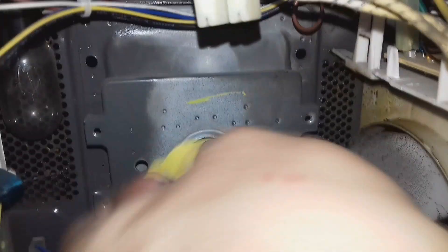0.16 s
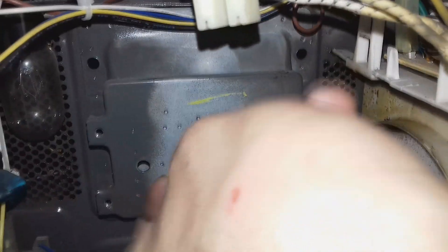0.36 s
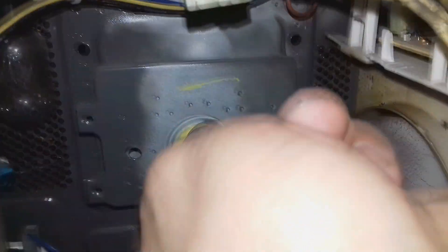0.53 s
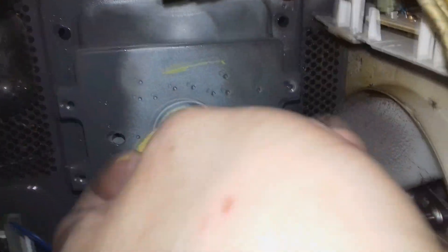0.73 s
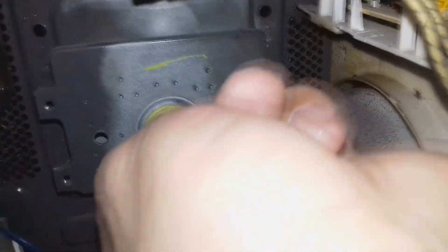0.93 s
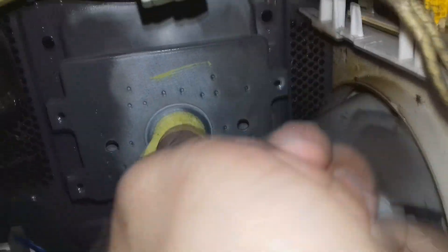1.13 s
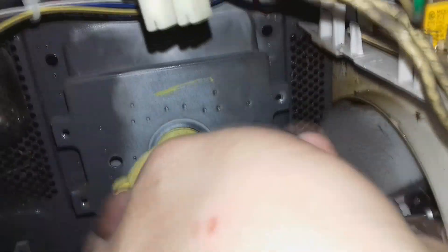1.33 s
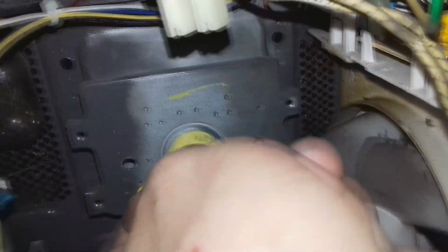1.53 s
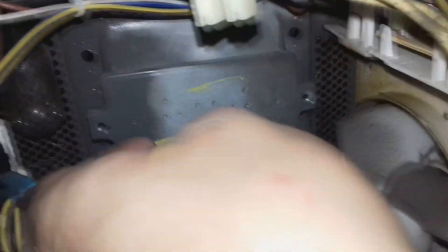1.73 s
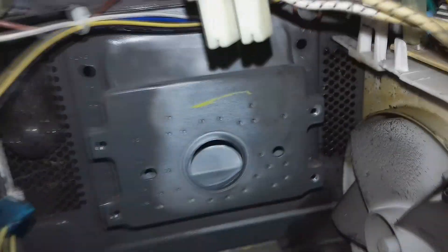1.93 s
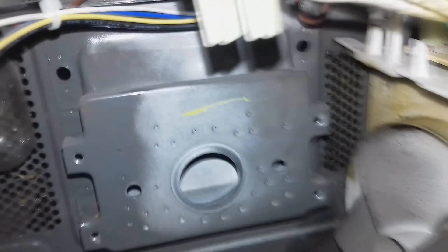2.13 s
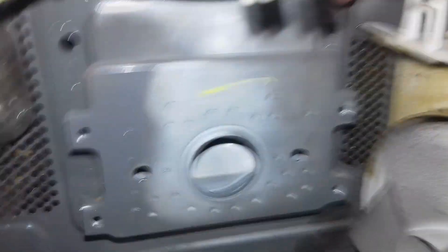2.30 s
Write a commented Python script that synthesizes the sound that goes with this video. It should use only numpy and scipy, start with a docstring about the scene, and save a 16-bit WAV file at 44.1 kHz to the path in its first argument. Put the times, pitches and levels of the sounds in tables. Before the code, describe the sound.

Close up in a quiet room, a hand twists sandpaper against sheet steel, making uneven, gritty scrapes with a thin metallic ring. The final stroke is the loudest and rings out briefly, followed by a faint brush and a small click.

```python
"""In a quiet room, close up, a hand twists sandpaper to and fro in the round port of a steel housing.
Grit catches and slips, ringing the sheet steel and its cabinet; the paper hisses, the wad drags
dully, and the hand rumbles and bumps. After a last hard stroke the hand lifts with a faint brush,
the steel rings out, and something small clicks."""
import sys
import numpy as np
from scipy import signal
from scipy.fft import rfft, irfft
from scipy.io import wavfile

SR = 44100
rng = np.random.default_rng(int(sys.argv[2]) if len(sys.argv) > 2 else 0)


def to_wav(sig):
    """Store sig (one row per channel, or 1-D mono) as 16-bit WAV at the path in sys.argv[1].

    Samples outside -1..1 are clipped; the rate is SR.
    """
    pcm = np.clip(np.atleast_2d(sig), -1, 1) * 32767
    pcm = np.round(pcm).astype(np.int16)
    wavfile.write(sys.argv[1], SR, pcm.T)  # frames by channels


N = 108486
TIME = np.arange(N) / SR


def amp(db):
    """Decibels to gain."""
    return 10 ** (np.asarray(db) / 20)


def unit(x):
    """Scales to rms 1."""
    return x / np.sqrt(np.mean(x ** 2) + 1e-20)


def at_hz(points, hz):
    """Reads a table on a log-frequency axis."""
    f, value = np.transpose(points)
    return np.interp(np.log(hz + 1), np.log(f + 1), value)


def curve(points):
    """Draws an envelope through (time, value) breakpoints."""
    s, value = np.transpose(points)
    return np.interp(TIME, np.maximum.accumulate(s), value)


def through(x, response):
    """Convolves with a response scaled to energy 1."""
    return signal.fftconvolve(x, response / np.linalg.norm(response))[:N]


def colour(x, eq, size=4096):
    """Minimum-phase EQ; the table sets only the shape, not the overall gain."""
    log_gain = np.log(amp(at_hz(eq, abs(np.fft.fftfreq(size, 1 / SR)))))
    spectrum = np.exp(np.conj(signal.hilbert(log_gain)))
    return through(x, np.fft.ifft(spectrum).real[:size // 2])


def ring(modes, start=0):
    """Dying modes struck at the start time."""
    t = TIME - start
    return (t >= 0) * sum(amp(db - 60 * abs(t) / t60) * np.sin(2 * np.pi * hz * t)
                          for hz, db, t60 in modes)


def grit(grains_per_s=5500, spread_db=4):
    """Tiny slips of many grains, a few of them large: the raw texture of all the rubbing."""
    size = amp(spread_db * np.minimum(rng.exponential(1, N), 4))
    return unit(size * rng.choice([-1., 1.], N) * (rng.random(N) < grains_per_s / SR))


def room_tone(level_db=-53.5):
    """A steady bed of quiet room noise."""
    # colour of the room: f/Hz, level/dB
    room_eq = [(25, -18), (52, -22), (90, -13), (243, -15.5), (500, -12.5), (900, -11.5), (1400, -7.5),
               (1750, -6), (2300, -1), (3380, -7), (4500, -18.5), (12000, -31)]
    return amp(level_db) * colour(rng.standard_normal(N), room_eq)


def hand_brush(peak_s=2.247, half_width_s=0.16, level_db=-49.5):
    """One soft swell of brushing as the hand withdraws."""
    # colour of the brushing: f/Hz, level/dB
    brush_eq = [(500, -16), (1600, 2.5), (2200, 6.5), (3300, 1), (4300, -27), (9000, -25)]
    swell = np.exp(-((TIME - peak_s) / half_width_s) ** 2)
    return amp(level_db) * colour(grit() * swell, brush_eq)


def small_click(trim_db=-8.5):
    """One hard tap rings something small."""
    # cue for the click: t/s, level/dB before the trim
    cues = [(2.4024, -23.5)]
    # modes of the small object: f/Hz, level/dB, t60/s
    modes = [(1784, -8, 0.041), (1620, -20.5, 0.29), (2330, -2.5, 0.0038), (2800, -3, 0.0064),
             (3350, -9, 0.019)]
    # colour of the tap: f/Hz, level/dB
    tap_eq = [(500, -26), (1300, -17), (1700, 1), (3600, 4.5), (4600, -9), (7000, -20), (12000, -27)]
    return colour(sum(amp(db + trim_db) * ring(modes, s) for s, db in cues), tap_eq)


def hand_bumps(attack_s=0.0042):
    """The soft hand bumps the housing and rings its low modes."""
    # cues for the bumps: t/s, level/dB
    cues = [(0.731, -43), (1.182, -39.5), (1.641, -46)]
    # modes that a bump rings: f/Hz, level/dB, t60/s
    modes = [(205, -2, 0.18), (244.3, 5, 0.21), (312, -3, 0.16), (434, -2, 0.095)]
    return sum(amp(db) * np.clip((TIME - s) / attack_s, 0, 1) * ring(modes, s) for s, db in cues)


def hand_rumble(grip):
    """Low drag of the hand on the panel."""
    # envelope of the rumble: t/s, level/dB
    envelope = [(0, -52), (.07, -61), (.12, -48.5), (.22, -53), (.3, -55.5), (.42, -64), (.54, -63),
                (.63, -52.5), (.74, -50), (.82, -59), (.88, -51), (.98, -71), (1.06, -50.5), (1.14, -66),
                (1.2, -48), (1.3, -49), (1.37, -76), (1.53, -58), (1.66, -53.5), (1.78, -58), (1.89, -76),
                (1.96, -51), (2.15, -71)]
    # colour of the rumble: f/Hz, level/dB
    rumble_eq = [(25, -32), (52, -43), (78, 2), (110, 4), (170, 4), (240, -2.5), (400, 2.5), (900, -8),
                 (4000, -64)]
    return colour(grit() * grip * amp(curve(envelope)), rumble_eq)


def judder(centre_hz=90, depth_db=0.5):
    """The wad grips and slides unevenly, putting a slight random flutter on the level."""
    hz = np.fft.rfftfreq(N, 1 / SR)
    flutter = irfft(rfft(rng.standard_normal(N)) * hz * np.exp(-2 * hz / centre_hz), N)
    return unit(amp(depth_db * unit(flutter)))


def cabinet(x, patterns=3, shift_s=0.2118):
    """Dense reflections in the steel cabinet; patterns crossfade steadily to suggest the moving hand."""
    # ring time of the cabinet: f/Hz, t60/s
    ring_time = [(200, 0.33), (1500, 0.17), (3000, 0.068), (8000, 0.13)]
    out = np.zeros(N)
    fade_phase = np.pi * TIME / (patterns * shift_s)
    for k in range(patterns):
        taps = rng.choice([-1., 1.], SR // 2) * (rng.random(SR // 2) < 0.1)
        hz, t, bands = signal.stft(taps, SR, nperseg=256)
        decay = amp(-60 * t / at_hz(ring_time, hz)[:, None])
        tail = signal.istft(bands * decay, SR, nperseg=256)[1]
        out += through(x * np.cos(fade_phase + np.pi * k / patterns), tail)
    return out * np.sqrt(2 / patterns)


def wad_drag(grip, trim_db=-3):
    """Dull drag of the soft folded paper, heard directly and through the cabinet."""
    # envelope of the drag: t/s, relative level/dB
    envelope = [(0.0, -57), (0.09, -47), (0.13, -43.5), (0.5, -57.5), (0.61, -49.5), (0.65, -35),
                (0.72, -33.5), (0.83, -42), (0.89, -39.5), (1.01, -61), (1.04, -35), (1.08, -36.5),
                (1.12, -49.5), (1.32, -39.5), (1.39, -51.5), (1.78, -42.5), (1.9, -30), (2.15, -60.5)]
    # colour of the drag: f/Hz, level/dB
    wad_eq = [(60, -41), (170, -33), (240, -10.5), (370, -3.5), (470, -2), (540, -6.5), (680, 0.5),
              (820, -2), (1000, -9.5), (1500, -8.5), (4000, -44)]
    drag = colour(grit() * grip * amp(trim_db + curve(envelope)), wad_eq)
    return 0.69 * drag + 0.65 * cabinet(drag)


def paper_hiss(force_db, grip, snaps, hiss_db=-52, usual_force_db=-27, tick_db=-29.5):
    """Fine hiss of the paper itself, with a tick at each catch."""
    # fader ride on the hiss: t/s, level/dB
    ride = [(0, 2), (.06, 1), (.13, 8), (.25, 8), (.33, 5), (.42, 1), (.62, 0), (.7, -5), (.9, 0),
            (1.08, -2), (1.15, -3), (1.3, -2), (1.45, 4), (1.6, -2), (1.72, 2), (1.85, 1), (2.0, -5)]
    # colour of the paper: f/Hz, level/dB
    paper_eq = [(1000, 1), (3500, 6), (5400, 5), (6100, 0), (7600, 3.5), (8600, -6.5), (9400, -14),
                (10200, -1.5), (12000, -15.5)]
    push_db = 0.84 * (force_db - usual_force_db)  # grows more slowly with force than the scrape does
    hiss = grit() * grip * amp(hiss_db + curve(ride) + push_db)
    return colour(hiss + amp(tick_db) * snaps, paper_eq)


def wrist_force():
    """How hard the hand rubs, in dB, through four turns and the lift."""
    # rubbing force, one list for each to-and-fro turn: t/s, level/dB
    turns = [
        [(0.0, -25), (0.03, -37), (0.068, -37.5), (0.124, -28.5), (0.13, -21.5), (0.158, -33), (0.216, -36.5),
         (0.25, -20.5), (0.27, -26.5), (0.32, -30.5), (0.44, -44.5), (0.474, -36), (0.57, -44), (0.58, -38)],
        [(0.58, -46.5), (0.654, -20), (0.692, -14.5), (0.714, -27.5), (0.734, -18), (0.772, -32.5),
         (0.778, -27), (0.818, -30), (0.892, -25), (0.954, -38), (1.0, -38)],
        [(1.0, -54), (1.012, -22), (1.026, -37.5), (1.034, -23), (1.072, -18.5), (1.098, -26.5), (1.198, -42),
         (1.206, -27.5), (1.23, -31), (1.234, -26.5), (1.374, -34), (1.456, -33), (1.504, -50), (1.51, -40)],
        [(1.51, -47), (1.524, -41), (1.538, -28.5), (1.556, -29), (1.598, -35), (1.666, -30), (1.678, -37.5),
         (1.698, -30.5), (1.806, -34.5), (1.82, -22.5), (1.888, -10), (1.976, -29.5), (2.12, -44.5)],
    ]
    # the paper has left the steel: t/s, level/dB
    lifted = [(2.3, -75)]
    return curve([point for turn in turns for point in turn] + lifted)


def grain_catches(decay_s=0.0018, boost_db=14, size=512):
    """Each coarse grain catches, then snaps free in a short cluster of slips."""
    # cues for the snaps: t/s, level/dB before the boost
    cues = [(0.077, -38), (0.1291, -11.5), (0.2337, -18), (0.2495, -39), (0.322, -14.5), (0.470, -22.5),
            (0.508, -21.5), (0.634, -11), (0.6512, -15), (0.6741, -7), (0.724, -11.5), (0.7366, -17),
            (0.7797, -10.5), (1.009, -22), (1.032, -15), (1.2064, -14), (1.2341, -10.5), (1.539, -20.5),
            (1.558, -15.5), (1.699, -23), (1.715, -17), (1.8169, -18), (1.8378, -4.5), (1.8627, -12),
            (1.906, -7.5)]
    out, t = np.zeros(N + size), np.arange(size) / SR
    for s, db in cues:
        snap = rng.standard_normal(size) * np.exp(-t / decay_s)
        out[round(s * SR):][:size] += amp(db + boost_db) * snap / np.linalg.norm(snap)
    return out[:N]


def brighten(drive, crossover_hz=2200):
    """A moving tilt EQ shifts the drive between the steel's lower and upper resonances."""
    # highs against lows: t/s, level/dB
    brightness = [(0, 1), (.14, 0.5), (.33, -3.5), (.5, 4), (.68, 4), (.8, 4), (1.07, 3), (1.16, -6),
                  (1.22, 5.5), (1.42, -3), (1.56, 4), (1.84, 3), (1.91, 1.5), (2.05, -4)]
    hz = np.fft.rfftfreq(N, 1 / SR)
    tilt = amp(curve(brightness) / 2)
    lows = irfft(rfft(drive) / (1 + (hz / crossover_hz) ** 10), N)
    return lows / tilt + (drive - lows) * tilt


def steel_scrape(drive, let_go_s=1.83, fade_s=0.033, radiates_hz=(260, 5400)):
    """Grit scrapes the steel and rings the housing, whose modes last longer once the hand lets go."""
    # colour of the scraped steel: f/Hz, level/dB
    steel_eq = [(40, -78.5), (170, -61.5), (250, -29.5), (310, -17.5), (480, -26), (600, -23.5), (780, -22),
                (980, -28), (1180, -13), (1300, -1), (1480, -7), (1800, -0.5), (2100, -8.5), (2400, -9),
                (2650, -4.5), (3200, 0.5), (3550, -9), (3950, -15), (4150, -12), (4350, -23.5),
                (4520, -13.5), (4700, -30), (5300, -24), (6000, -64), (9000, -59), (13000, -65)]
    # housing modes damped by the hand: f/Hz, level/dB, t60/s
    held_modes = [(298, -15, .25), (378, -11, .25), (680, -11, .12), (1255, -7, .14), (1316, -6, .15),
                  (1592, -4, .15), (1662, -1, .2), (1836, -2, .18), (1877, -2, .15), (2620, 3, .13),
                  (2799, -2, .16), (2833, 0, .18), (2967, -1, .18), (3160, 1, .13), (3310, 3, .13),
                  (4070, -11, .1), (4535, -14, .1)]
    # housing modes as the hand lets go: f/Hz, level/dB, t60/s
    free_modes = [(300, -13, .25), (364, -14, .5), (580, -18, .6), (869, -13, .3), (1295, -3, .38),
                  (1748, -2, .6), (1808, 0, .28), (1843, -1, .28), (1905, -2, .38), (2602, -5, .33),
                  (2660, -9, .45), (2914, -7, .33), (2987, -4, .35), (3144, -3, .42), (3460, -9, .25),
                  (3711, -11, .3), (4556, -12, .28)]
    held_db, free_db, direct_db, cabinet_db = -8.5, -6.5, -4, -6
    scrape = colour(drive, steel_eq)
    release = np.clip((TIME - let_go_s) / fade_s, 0, 1)
    held = amp(held_db) * through(drive * (1 - release), ring(held_modes))
    free = amp(free_db) * through(drive * release, ring(free_modes))
    ringing = signal.sosfilt(signal.butter(2, radiates_hz, "band", fs=SR, output="sos"), held + free)
    return amp(direct_db) * scrape + amp(cabinet_db) * cabinet(scrape) + ringing


def scene():
    """Mono mix: the scrubbing up front, with bumps, click and brushing over the room tone."""
    force_db, grip, snaps = wrist_force(), judder(), grain_catches()
    friction = grit() * grip * amp(force_db) + snaps
    steel = steel_scrape(brighten(friction))
    scrub = steel + wad_drag(grip) + paper_hiss(force_db, grip, snaps) + hand_rumble(grip)
    return (scrub + hand_bumps() + small_click() + room_tone() + hand_brush())[None]


def record(dry, low_cut_hz=62, high_cut_hz=12200):
    """The microphone's low cut, then a steep high cut."""
    low_cut = signal.butter(4, low_cut_hz, "high", fs=SR, output="sos")
    high_cut = signal.firwin(511, high_cut_hz, window=("kaiser", 9), fs=SR)
    return signal.oaconvolve(signal.sosfilt(low_cut, dry), high_cut[None], "same")


dry = scene()
out = record(dry)
to_wav(out)
```